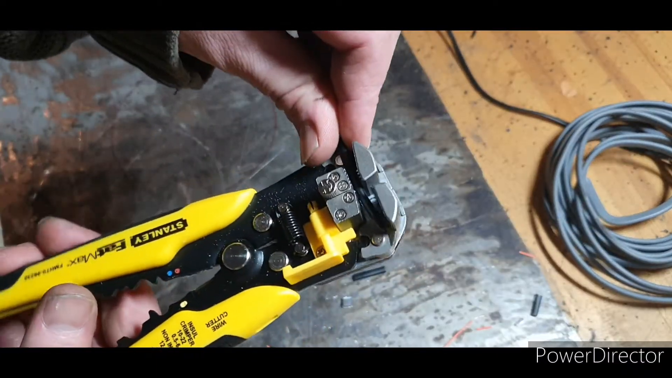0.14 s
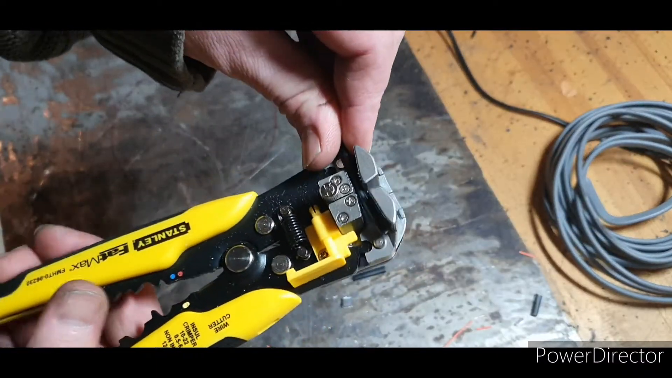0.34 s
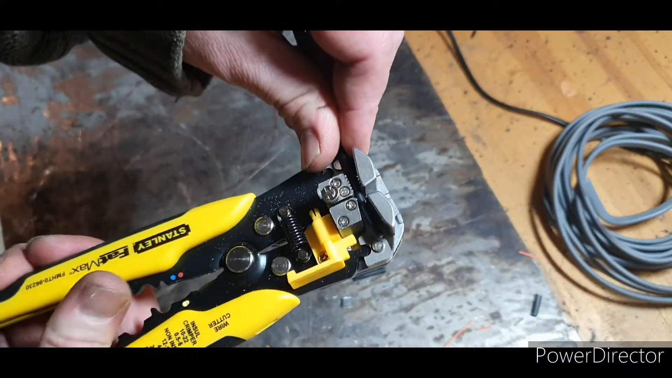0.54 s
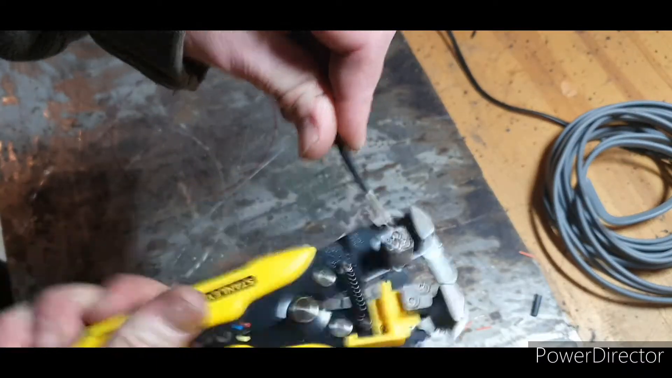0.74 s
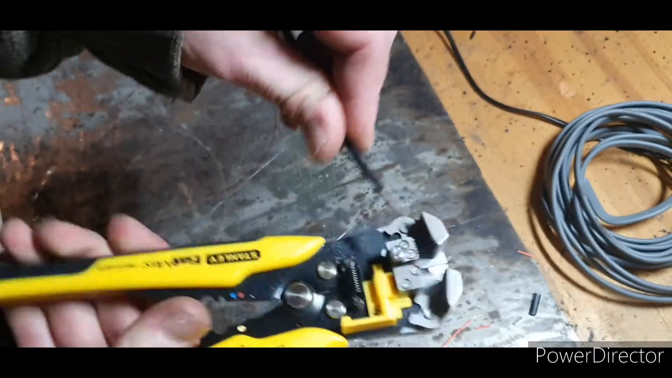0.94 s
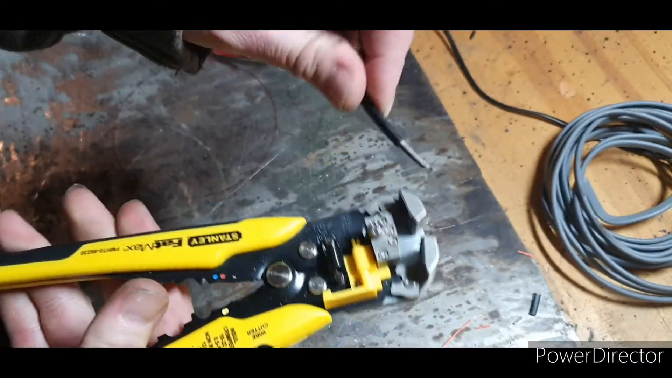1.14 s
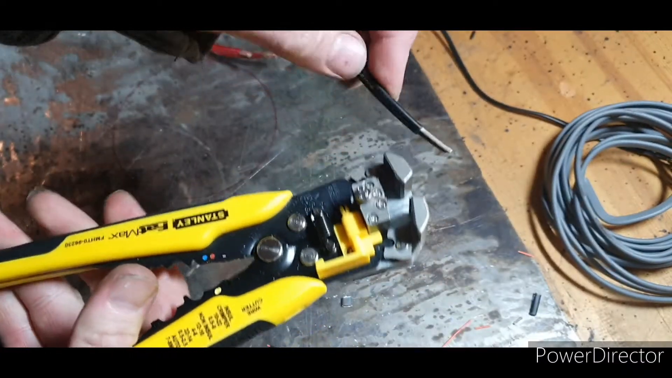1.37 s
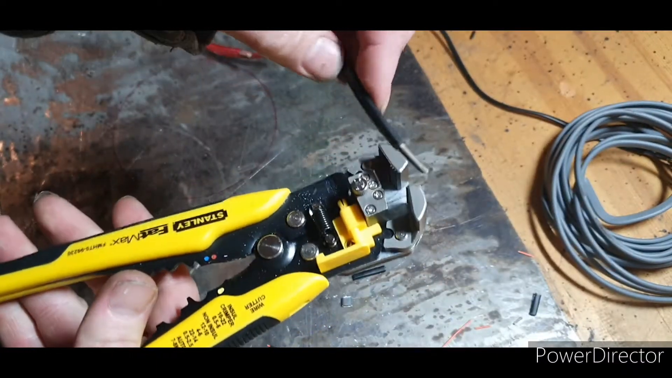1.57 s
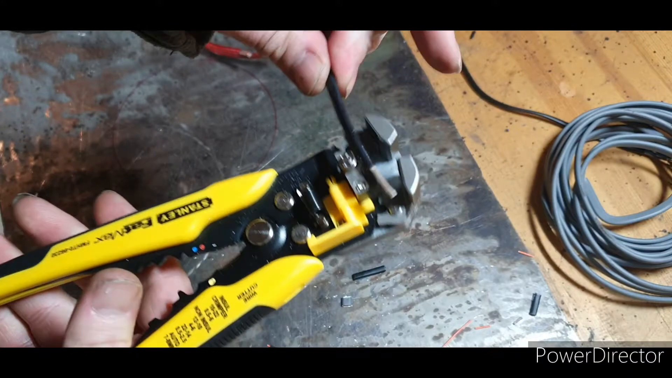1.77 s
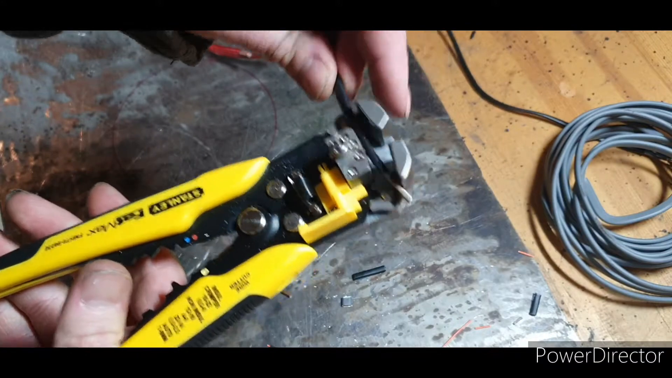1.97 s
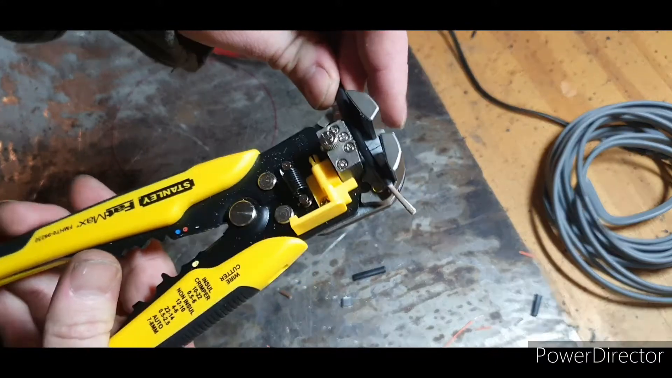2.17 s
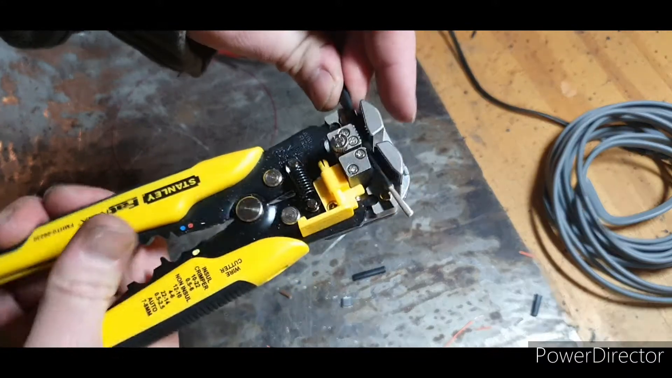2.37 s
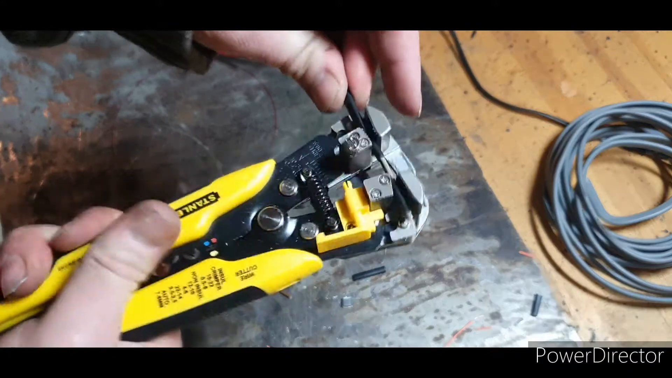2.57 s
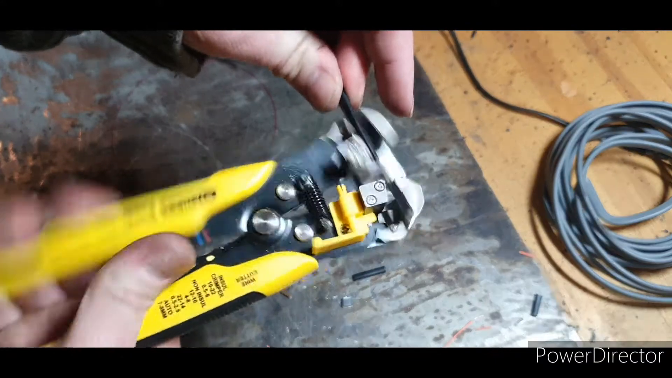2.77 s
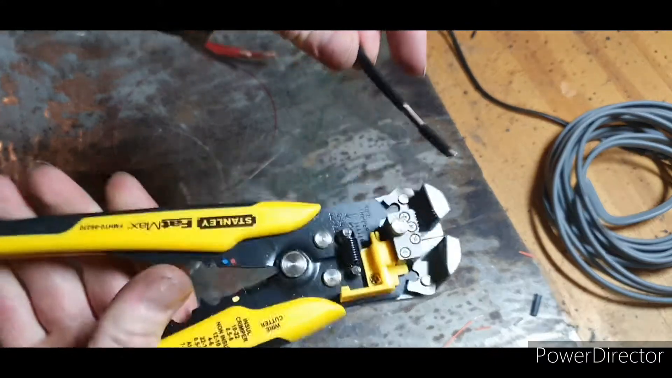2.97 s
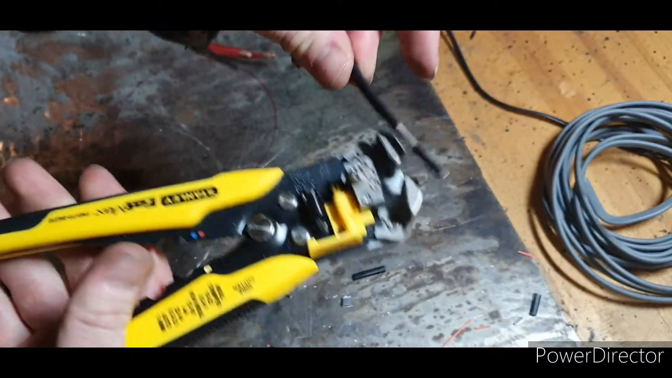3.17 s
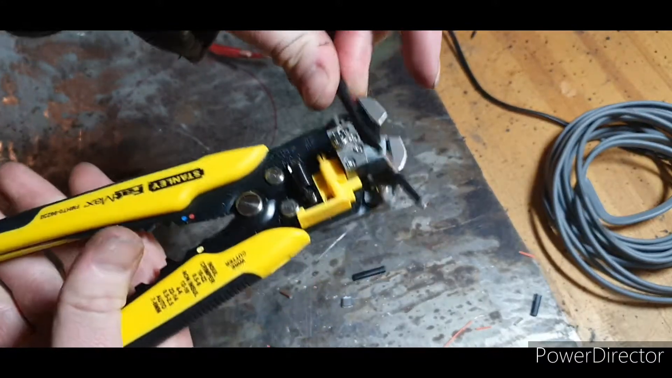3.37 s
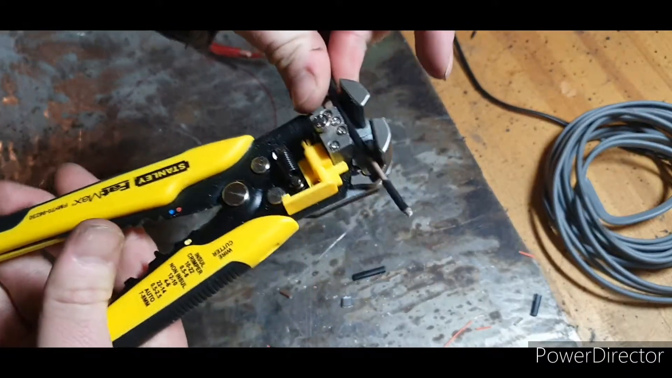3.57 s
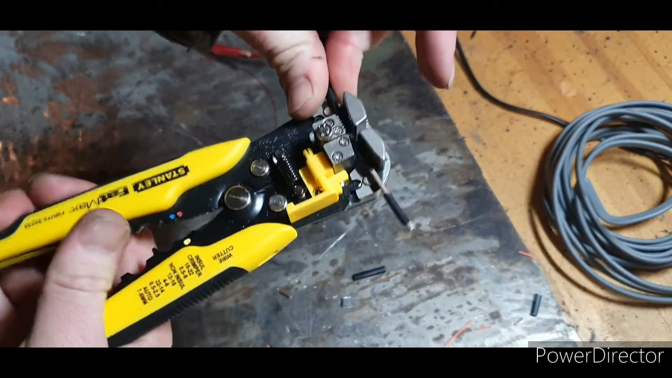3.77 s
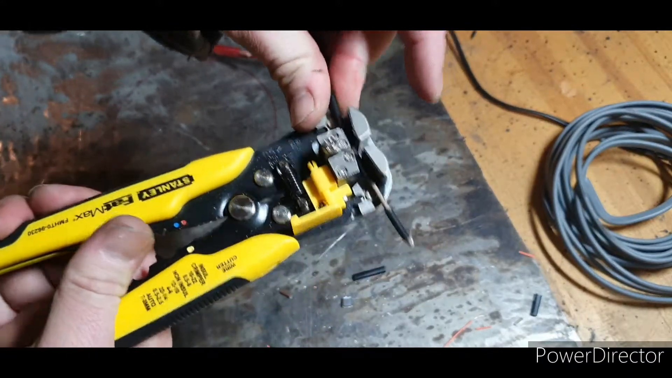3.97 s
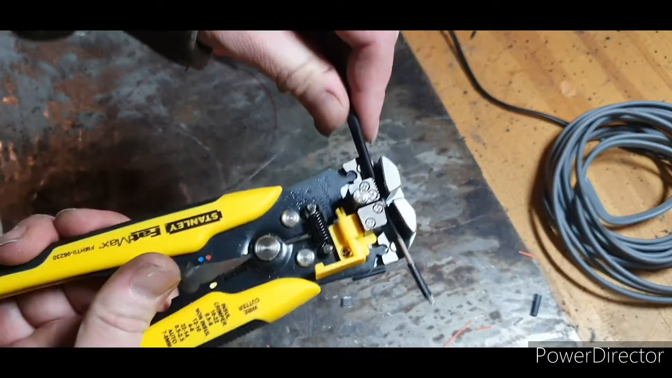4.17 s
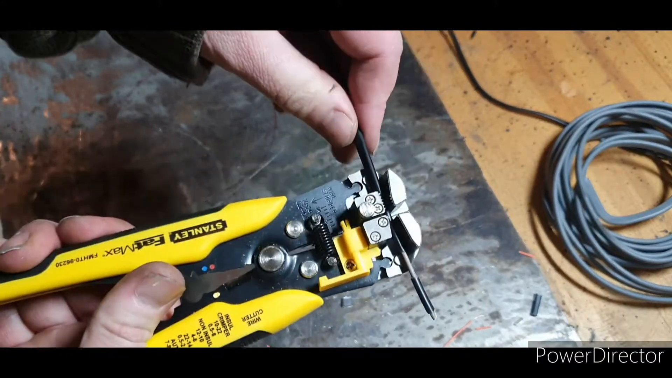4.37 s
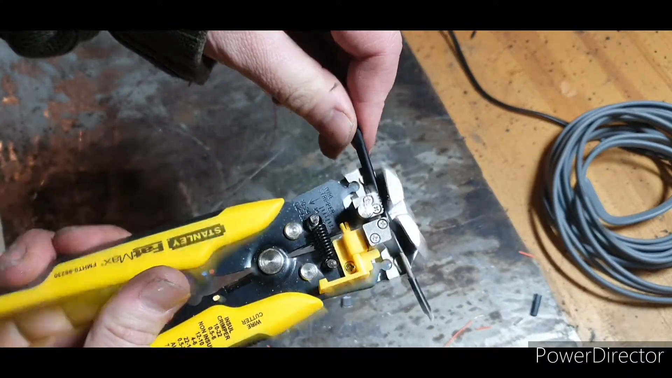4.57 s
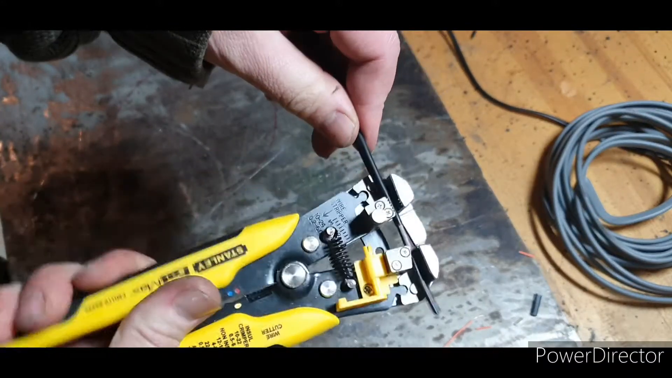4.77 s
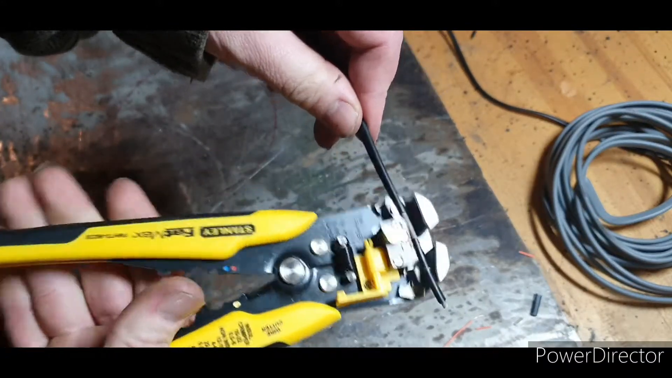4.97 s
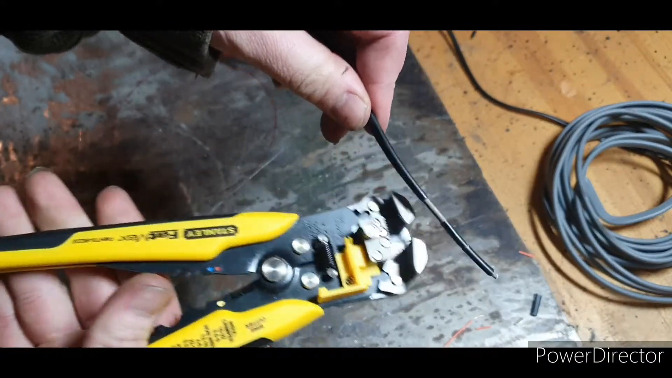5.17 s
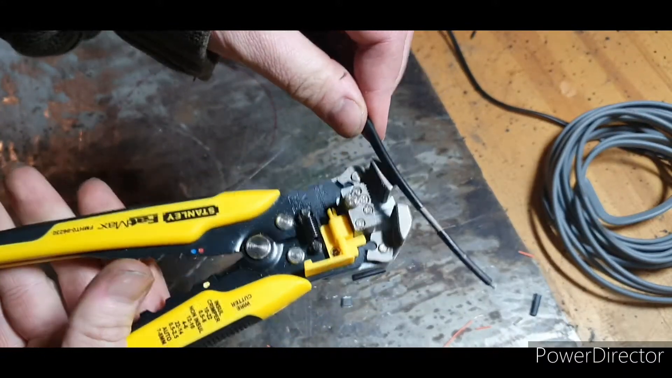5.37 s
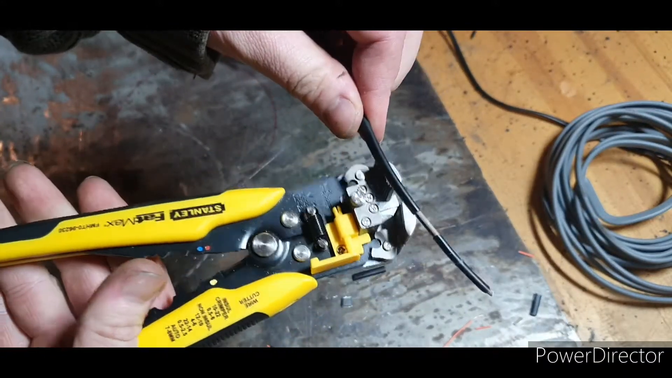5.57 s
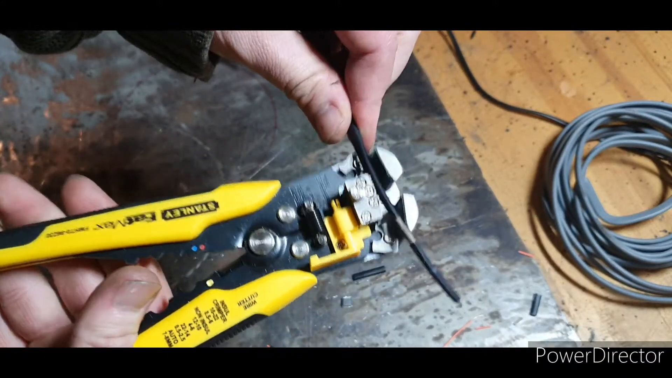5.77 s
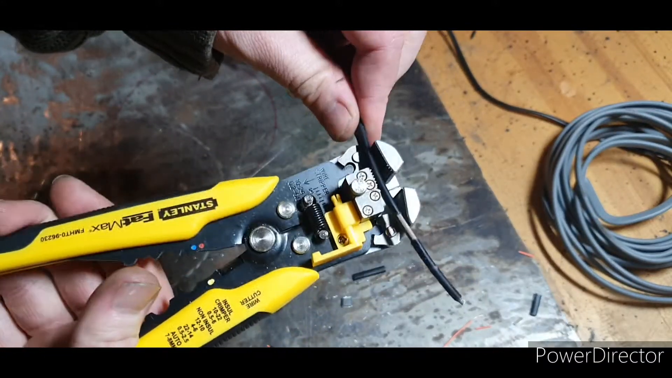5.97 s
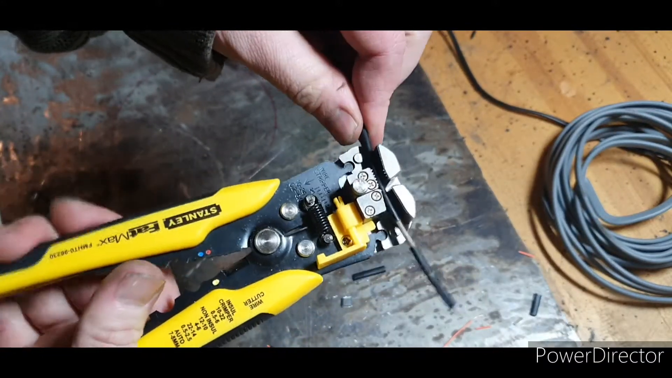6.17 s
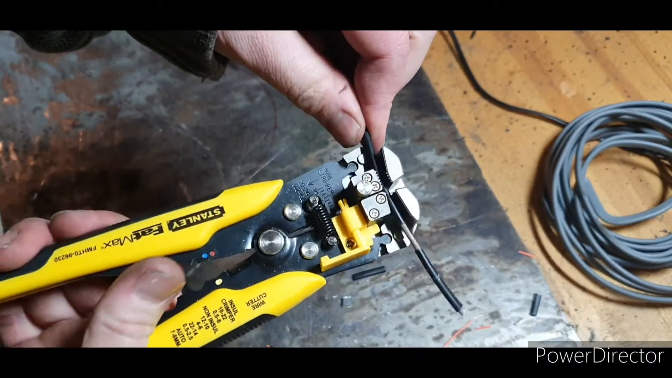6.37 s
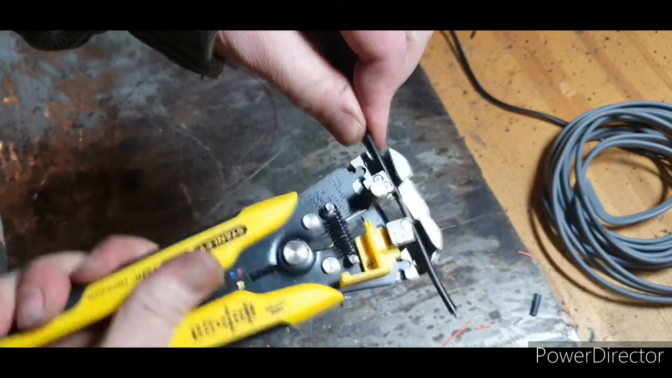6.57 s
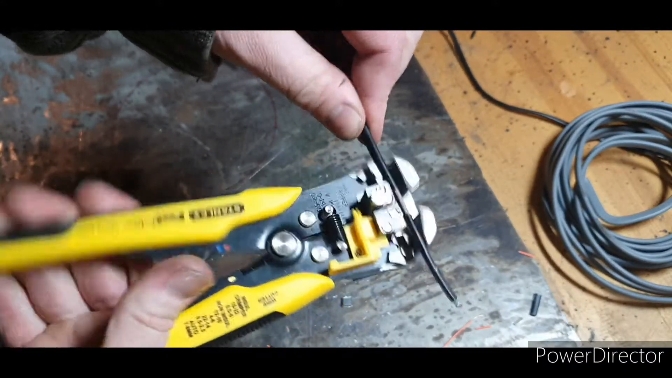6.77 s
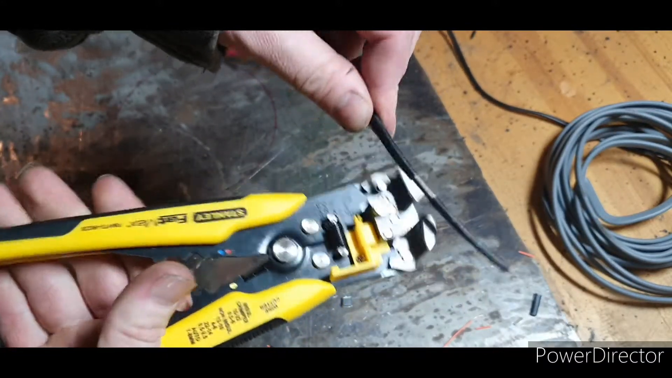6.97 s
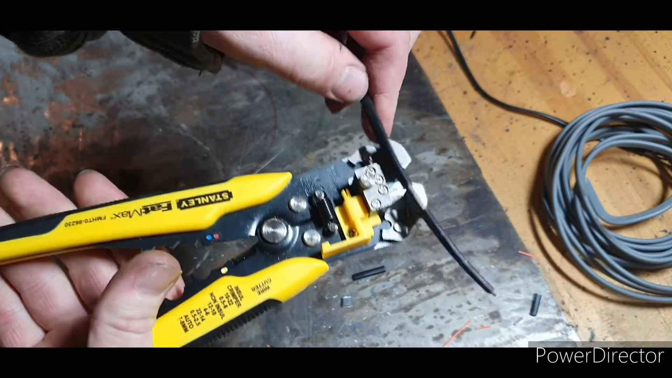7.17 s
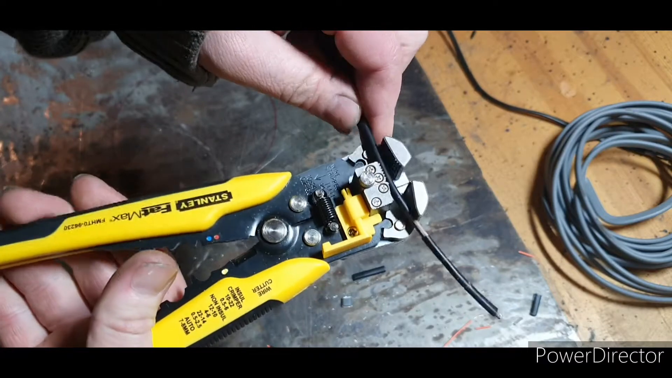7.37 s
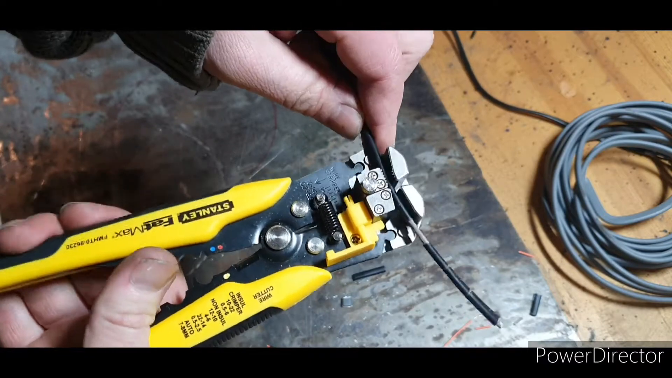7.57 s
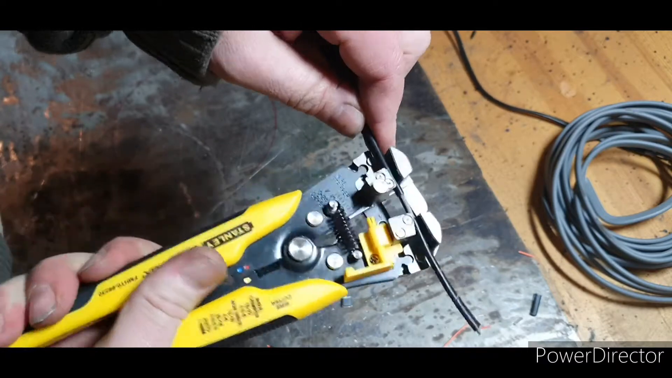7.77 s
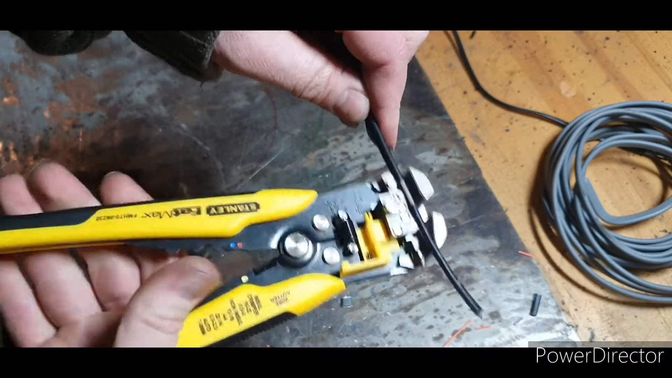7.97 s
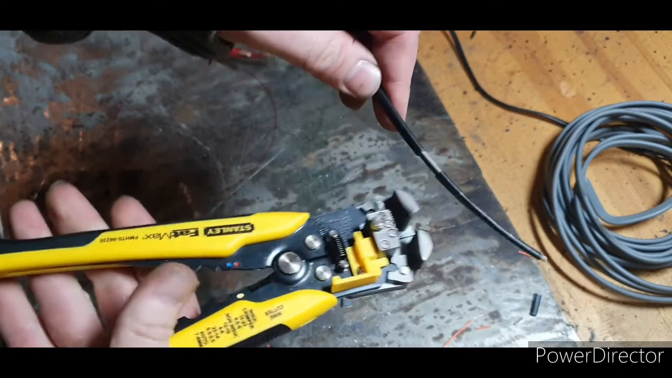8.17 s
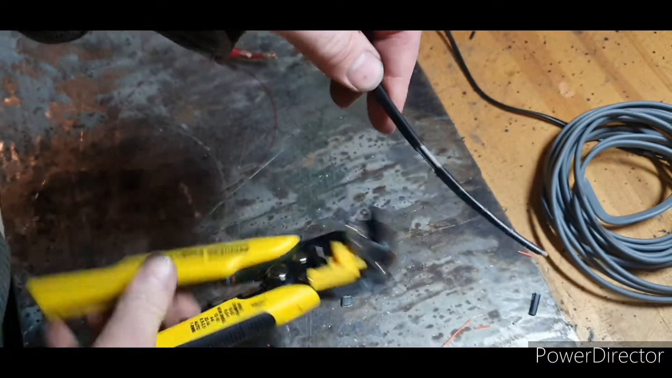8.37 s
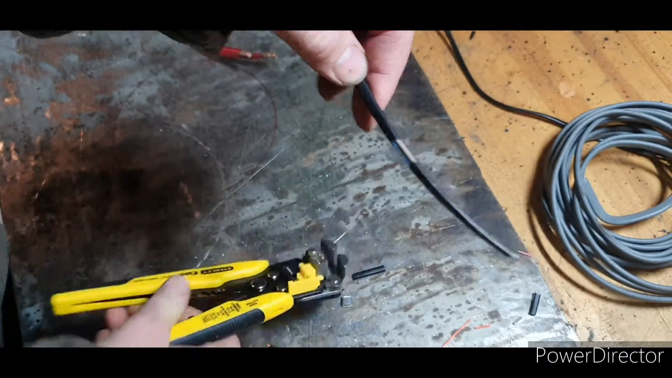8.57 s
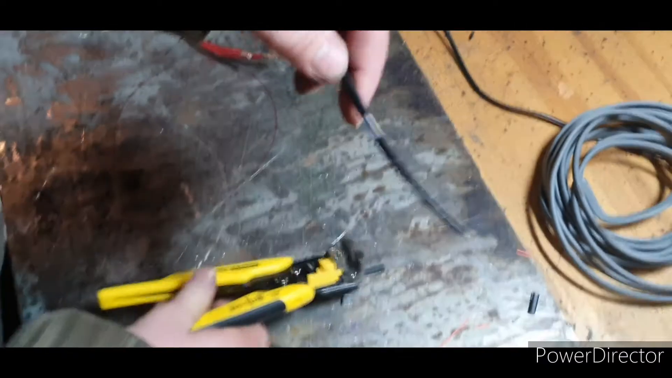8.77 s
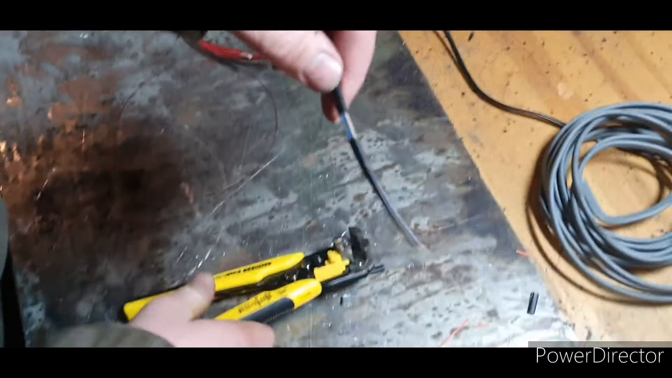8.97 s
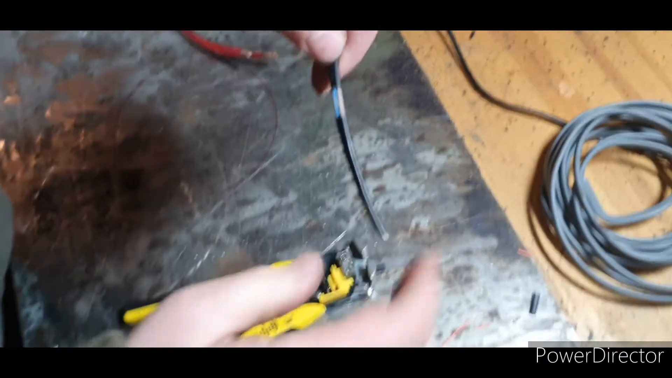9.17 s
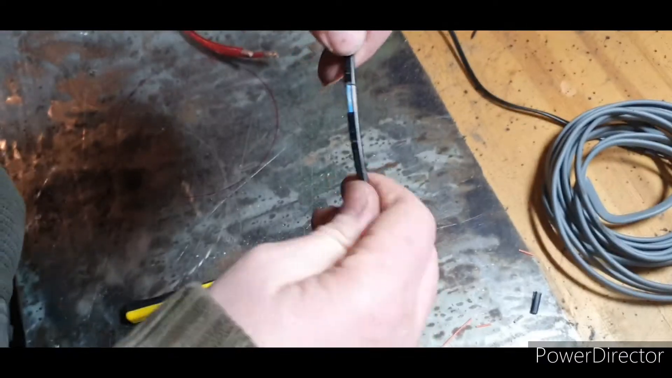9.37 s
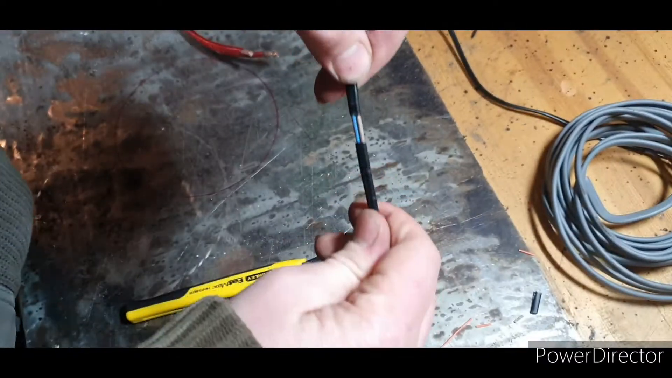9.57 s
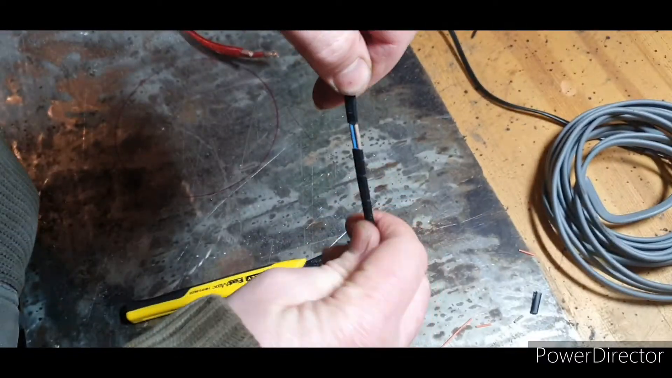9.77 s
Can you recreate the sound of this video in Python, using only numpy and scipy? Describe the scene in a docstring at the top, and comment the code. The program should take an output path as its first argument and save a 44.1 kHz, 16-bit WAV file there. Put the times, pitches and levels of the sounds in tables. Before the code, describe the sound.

Close over a workbench in a small workshop, automatic wire strippers are squeezed five times. Each squeeze gives a tiny crunch and sharp snap with a soft low thump, then two clicks and a bright springy metal slam as the jaws open. Light wire scrapes and ticks fill the gaps over faint low hum. Finally the tool drops, booming and clattering.

```python
"""A faint machine hum and a few light ticks, then the thump and snap of automatic wire strippers on a cable.
Recorded close over a workbench in a small workshop, with two microphones; five squeezes in all.
Each squeeze crunches and snaps through the insulation; the slides click back and the spring slams the jaws open.
At the end the tool is dropped and tumbles on the bench, which booms. Blows are filtered noise bursts and
decaying sine modes; scrapes are gritty noise; the hum is unsteady sines over filtered noise."""
import sys
import numpy as np
from scipy import signal
from scipy.fft import rfft, irfft, next_fast_len
from scipy.io import wavfile
from scipy.ndimage import map_coordinates

SR = 44100
rng = np.random.default_rng(int(sys.argv[2]) if len(sys.argv) > 2 else 0)


def generate_wav(sig):
    """Save sig (samples, or channels by samples) to the path in sys.argv[1] as 16-bit PCM at SR."""
    pcm = np.round(np.clip(np.atleast_2d(sig).T, -1, 1) * 32767).astype(np.int16)
    wavfile.write(sys.argv[1], SR, pcm)


N = 433503
TOP_HZ = 15700  # upper band limit
LEAD = round(.012 * SR)  # samples kept ahead of each blow
T = (np.arange(SR // 2) - LEAD) / SR  # seconds from one blow
CLICK_TILT_DB = 3  # brightness of the clicks, dB per octave

# squeezes through the insulation, levels before each layer's own gain:
# snap_s, snap_db, crunch_db, jolt_db, crunch_length_s (the crunch comes this long before the snap)
SQUEEZES = [(0.7482, -5.5, -18, -21, 0.0053), (2.55, -14, -27, -21.5, 0.0066),
            (4.6488, -15, -17.5, -18.5, 0.0062), (6.602, -17, -19.5, -18, .0068),
            (7.789, -26, -24.5, -21, 0.0086)]
# the slides click twice as the hand lets go, coming free and then home: time_s, relative_level_db
CLICKS = [(0.9348, -21.5), (0.9478, -19), (2.815, -24.5), (2.8403, -16.5), (4.8619, -24.5), (4.8745, -23),
          (6.775, -21), (6.7912, -23.5), (7.9463, -20), (7.9564, -19)]
# the spring slams the jaws open: time_s, relative_level_db, run_up_s
SLAMS = [(1.019, -10, 0.0045), (2.8648, -10, 0.004), (4.9750, -9, 0.0033), (6.8426, -9, 0.00365),
         (7.986, -9.5, 0.003)]
# spectrum of the steel jaws: frequency_hz, relative_density_db_per_hz
JAWS = [(100, -12.5), (700, -12), (1350, -13), (1900, -2), (2400, -4.5), (3300, 1.5), (4500, -2),
        (5600, -4), (7200, -7), (8700, -1.5), (10000, -3.5), (11500, -8.5), (14000, -15), (15300, -14.5)]
# spectrum of soft thumps of the hand: frequency_hz, relative_density_db_per_hz
FLESH = [(30, -21), (70, 7.5), (150, -6.5), (220, -1.5), (340, -0.5), (600, -14.5), (1100, -10.5),
         (2500, -40), (8000, -61)]
# spectrum of the rattling board: frequency_hz, relative_density_db_per_hz
BOARD = [(40, -11), (100, -0.5), (160, -0.5), (270, 2), (400, -3.5), (550, -6.5), (680, -10.5),
         (1050, -15.5), (1500, -26.5), (2500, -30), (10000, -50)]


def jaws():
    """Steel on insulation and steel on steel: bite, crunch and snap, then the slips and clicks of release."""
    # the slides slip in small jerks as the grip eases: time_s, level_db
    slips = [(0.838, -40), (0.871, -38), (0.8837, -31.5), (2.683, -51.5), (4.778, -42), (4.829, -46.5),
             (6.712, -51), (6.732, -43.5), (6.752, -41), (7.918, -43), (7.934, -38.5)]
    bite_lead, bite_db = 1.3, -39.5  # the blades first touch this many crunch lengths before the snap
    out = np.zeros((2, N))
    for s, snap_db, crunch_db, _, length in SQUEEZES:
        add(out, s - bite_lead * length, amp(bite_db) * click(tilt_db=1.2))
        crunch = contact(JAWS, -0.14, body_db=-3.5, body_t60=0.05, rub_db=-10.0, rub_s=0.0031)
        add(out, s - length, amp(crunch_db + 2.5) * crunch)
        snap = contact(JAWS, 1.0, body_db=-5.5, body_t60=0.039, rub_db=-23.5, rub_s=0.0011)
        add(out, s, amp(snap_db) * snap)
    for s, db in slips:
        add(out, s, amp(db) * scrape(tilt_db=-1.5, rise_s=0.0012))
    for s, db in CLICKS:
        add(out, s, amp(db) * click(CLICK_TILT_DB))
    return out


def spring():
    """The jaws chatter along their guide, hit the stop, ring the frame, rebound and rattle; the spring twangs."""
    # modes of the steel frame before the hand damps them: frequency_hz, relative_level_db, t60_s
    steel = [(1720, 5, .22), (1863, 8, .25), (2000, 8, 0.2), (2272, 3, .2), (3170, -1.5, 0.19),
             (3321, 5.5, 0.6), (3838, 0, .3), (4560, 2, .22), (5540, -1, .28), (8490, 5, 0.14)]
    # spectrum of the spring-driven blow: frequency_hz, relative_density_db_per_hz
    slam_spectrum = [(100, -21.5), (1400, -11.5), (1750, -9), (2100, 0.5), (2500, -6), (3200, 0.5),
                     (4500, -0.5), (6000, 3.5), (7200, -2.5), (8900, 2.5), (11000, -0.5), (13000, -2),
                     (15300, -14)]
    frame_db, grip_t60 = -35.5, 0.21  # ring relative to the slam; extra damping by the gripping hand (s)
    # the twang starts sharp by sag_hz and sags to its rest pitch
    rest_hz, sag_hz, sag_s, twang_db, twang_t60 = 1730, 662, .035, -26.5, .15
    rebound_s, rebound_db = .0075, -18.5  # one rebound from the stop, level relative to the slam
    out = np.zeros((2, N))
    for s, db, run_up in SLAMS:
        chatter = amp(-7.5) * (T < 0) * np.exp(np.minimum(T + run_up, 0) / 0.00015)
        stop = .8 * fade(.006) + amp(-6) * fade(.05)
        blow = colour(grain() * (chatter + stop), uneven(slam_spectrum, depth_db=1))

        roughness = amp(5.5 * wobble(260, len(T)))
        rattle = colour(grain() * fade(0.16) * roughness, slam_spectrum, tilt_db=-1.05)
        frame = amp(frame_db) * fade(grip_t60) * ring(steel, scatter_db=2.5, spread=.9)

        pitch_hz = rest_hz + sag_hz * np.exp(-np.abs(T) / sag_s)
        phase = 2 * np.pi * np.cumsum(pitch_hz) / SR + wobble(100, len(T))
        twang = amp(twang_db) * fade(twang_t60) * np.sin(phase)

        add(out, s, amp(db + 0.5) * (blow + frame + twang + amp(-29.5) * rattle))
        add(out, s + rebound_s, amp(db + rebound_db) * click(CLICK_TILT_DB))
    return out


def hands():
    """Heavily damped low thumps, soft bumps with the tool's moves, knocks of the linkage and hollow pocks."""
    # the linkage knocks as the load comes off it: time_s, level_db
    knocks = [(4.777, -41.5), (6.730, -37), (7.917, -35.5)]
    # soft low bumps of the hand: shifts of hold, a recoil and a shudder after a squeeze: time_s, level_db
    bumps = [(0.44, -56.5), (1.037, -40.5), (1.205, -47.5), (2.371, -50), (3.836, -59.5), (4.696, -33),
             (6.375, -56.5), (6.944, -49.5), (7.678, -51)]
    # hollow knocks, perhaps the hand bumping the recorder's stand:
    # time_s, level_db (before the left/right balance)
    pocks = [(0.8844, -12), (1.445, -42), (4.535, -44)]
    # spectrum of the hollow knocks: frequency_hz, relative_density_db_per_hz
    hollow_spectrum = [(200, -18.5), (600, -10.5), (900, 1), (1150, -0.5), (1550, -6), (2100, -21),
                       (10000, -23.5)]
    palm_db, recoil_db = -27, -36  # push on the palm relative to a click; recoil relative to a slam
    out = np.zeros((2, N))
    for s, _, _, jolt_db, length in SQUEEZES:
        # low modes: frequency_hz, level_db, t60_s
        push = ring([(66, 0, .095), (105, -11, .1)], scatter_db=.5, spread=.3)
        thump = amp(-11.0) * colour(noise(0.17) * fade(0.26), FLESH)
        add(out, s, amp(jolt_db) * (push + thump))
        crunch_thump = colour(noise(0.92) * fade(0.018), FLESH)
        add(out, s - length, amp(jolt_db - 7.0) * crunch_thump)
    for s, db in CLICKS:
        add(out, s, amp(db + palm_db) * bump())
    for s, db in knocks:
        knock = np.sin(2 * np.pi * 400 * T) + .5 * colour(noise(.5), BOARD)
        add(out, s, amp(db) * fade(.035) * knock)
    for s, db, _ in SLAMS:
        add(out, s, amp(db + recoil_db) * bump())
    for s, db in bumps:
        add(out, s, amp(db) * bump())
    for s, db in pocks:
        shape = fade(.04) * (1 - np.exp(-np.abs(T) / .001))
        hollow = amp([[-3], [2]]) * colour(noise(0.2) * shape, hollow_spectrum)  # leans right
        soft_bump = amp(-50) * bump()
        add(out, s, amp(db) * hollow + soft_bump)
    return out


def bench():
    """Each landing booms the top's modes, rattles the board and clacks the tool; returns (boom, clatter)."""
    # the tool lands and tumbles: time_s, boom_db, steel_db, contact_s, top_pitch_ratio (at that spot)
    drops = [(8.787, -10.5, -17, .0016, .97), (8.965, -12, -31.5, .0005, 1), (8.988, -16.5, -54, 0.0089, 1),
             (9.036, -14, -48, 0.0043, 1), (9.111, -15.5, -23.5, 0.0016, .92),
             (9.121, -10.5, -10.5, 0.00072, 1), (9.166, -16, -24, 0.00071, 0.99)]
    # modes of the bench top before that ratio: frequency_hz, relative_level_db, t60_s
    top_modes = [(38, -20, .8), (67, -13, 0.6), (90.5, 0.5, 0.3), (116, -3.5, 0.28), (206, -8, .2),
                 (250, -9.5, 0.14), (316, -5.5, 0.18), (397, -16, .15), (590, -16, .15), (775, -21, .13)]
    # spectrum of the whole tool clacking on the bench: frequency_hz, relative_density_db_per_hz
    clack_spectrum = [(500, -1), (850, 8), (1200, 5), (1800, 0.5), (2800, -6.5), (3700, -4.5), (5500, -9.5),
                      (7000, -20), (9500, -13.5), (15000, -31)]
    # how the bench leans between the microphones: frequency_hz, left_minus_right_db
    balance = [(90, -5), (130, -2), (280, 3.5), (480, -2)]
    board_hardness, board_db = 0.38, -2  # board level lies between boom (0) and steel (1), plus a gain
    # the nose clinks as it touches down before the hardest landing
    clink_s, clink_hz, clink_db, clink_t60 = 9.1095, 2800, -20.5, .025
    boom, clatter = np.zeros((2, 2, N))
    for s, boom_db, steel_db, contact_s, tuning in drops:
        # a long, soft contact excites only the low modes
        modes = []
        for hz, db, t60 in top_modes:
            softness_db = 10 * np.log10(1 + (hz * contact_s) ** 4)
            modes.append((hz * tuning, db - softness_db, t60))
        onset = 1 - np.exp(-np.abs(T) / .003)
        add(boom, s, amp(boom_db) * ring(modes, scatter_db=1.5, spread=.45) * onset)

        board = colour(noise(0.4) * fade(0.13), BOARD)
        clack = contact(clack_spectrum, 0, body_db=-2.5, body_t60=0.044, rub_db=-5, rub_s=0.0014)
        clatter_db = boom_db + board_hardness * (steel_db - boom_db) + board_db
        add(clatter, s, amp(clatter_db) * board + amp(steel_db) * clack)
    add(clatter, clink_s, amp(clink_db) * fade(clink_t60) * np.sin(2 * np.pi * clink_hz * T))

    # the tool skids from its first landing to its last
    first_s, last_s = drops[0][0], drops[-1][0]
    skid = swell(first_s, last_s - first_s, attack_s=.002, release_s=0.03) * amp(1.5 * wobble(90, N))
    clatter += amp(-52) * colour(noise(0.51, size=N) * skid, BOARD, tilt_db=6.0)
    return pan(boom, balance), pan(clatter, balance)


def wire():
    """The wire is fed in and drawn out: it scrapes the jaws, and the loose parts tick."""
    # the wire scrapes along the jaws: time_s, level_db, brightness_db_per_octave
    scrapes = [(1.194, -42.5, -2), (1.332, -48.5, -7), (1.411, -47, -5), (1.465, -44, -7),
               (2.268, -47.5, -2), (2.279, -52, -4), (2.315, -49.5, -3.5), (3.745, -55, -5),
               (3.757, -51, -3), (3.777, -50.5, -4), (5.837, -61.5, -5), (6.17, -54, -5.5),
               (6.192, -46, -1), (6.213, -46.5, -1.5), (7.322, -58.5, -3), (7.503, -53, -4.5),
               (7.544, -51, -1.5), (7.583, -55, -4.5), (7.715, -65, -2.5)]
    # light ticks of the loose jaws and linkage, and at 2.539 s a hard tick as the blades bite ahead of the
    # second crunch: time_s, level_db, brightness_db_per_octave
    ticks = [(0.324, -54, 0.5), (0.3643, -37.5, 1), (0.678, -59.5, -2), (2.022, -58, 0), (2.421, -61.5, -2),
             (2.511, -59.5, -4), (2.539, -30, -7.5), (3.51, -64.5, -6), (3.73, -51.5, -4), (4.534, -39, 2),
             (4.603, -60, 4), (5.084, -45, -3), (6.484, -61, -4), (6.562, -60, 4), (7.077, -59.5, -3),
             (7.761, -51, 0)]
    out = np.zeros((2, N))
    for s, db, tilt in scrapes:
        add(out, s, amp(db) * scrape(tilt, rise_s=0.004))
    for s, db, tilt in ticks:
        tick = contact(JAWS, tilt, body_db=-4.5, body_t60=0.14, rub_db=-15.5, rub_s=.001)
        add(out, s, amp(db) * tick)
    return out


def workshop():
    """Low rumble, thin hiss, a machine's tones with wandering phase, and a low drone that swells twice."""
    # the machine's steady tones: frequency_hz, level_db_rms
    whine = [(60, -60.5), (700, -85), (801, -83)]
    # the drone's swells: full_from_s, hold_s, level_db_rms
    drones = [(3.976, 0.65, -54.5), (4.99, 0.18, -43)]
    # spectrum of the shop's rumble and hiss: frequency_hz, relative_density_db_per_hz
    air = [(20, -8), (40, -1), (58, -2), (85, -11.5), (115, -7), (150, -16.5), (280, -24.5), (500, -38),
           (850, -31), (1300, -44.5), (3000, -48.5), (7400, -58.5), (8700, -45), (10500, -57.5)]
    t = np.arange(N) / SR

    def tone(hz):
        """A sine of unit rms with a wandering phase."""
        return np.sqrt(2) * np.sin(2 * np.pi * hz * t + 1.3 * wobble(8.4, N))

    drone = sum(amp(db) * swell(s, hold, attack_s=0.091, release_s=0.034) for s, hold, db in drones)
    hum = sum(amp(db) * tone(hz) for hz, db in whine) + drone * tone(61)
    return hum + amp(-57) * colour(noise(0.4, size=N), air)


def room(x):
    """Each third of a second gets its own short diffuse tail of noise, decaying at its own rate in each band."""
    # decay of the small workshop: frequency_hz, t60_s
    decay = [(60, 0.84), (300, 0.27), (1000, 0.3), (3000, 0.28), (8000, 0.21), (15000, 0.22)]
    out = np.zeros((2, N + SR))
    step = SR // 3
    for start in range(0, N, step):
        hz, t, z = signal.stft(rng.standard_normal((2, SR // 2)), SR, nperseg=256)
        falling = amp(-60 * t / along(decay, hz)[:, None])
        build_up = 1 - np.exp(-t / 0.00076)
        tail = signal.istft(z * falling * build_up, SR, nperseg=256)[1]
        wet = signal.fftconvolve(x[:, start:start + step], tail / np.linalg.norm(tail[0]), axes=1)
        out[:, start:start + wet.shape[1]] += wet
    return out[:, :N]


def contact(spectrum, tilt_db, body_db, body_t60, rub_db, rub_s, crack_t60=0.00099):
    """A part slides, strikes with a short crack, and its dense modes die away."""
    rub = (T < 0) * amp(rub_db) * np.exp(-np.abs(T) / rub_s)
    shape = rub + fade(crack_t60) + amp(body_db) * fade(body_t60)
    return colour(grain() * shape, uneven(spectrum, depth_db=1.6), tilt_db)


def click(tilt_db):
    """One hard, short click of steel on a part of the tool."""
    hit = contact(JAWS, tilt_db, body_db=-14, body_t60=.06, rub_db=-14, rub_s=.002, crack_t60=.007)
    return amp(5) * hit


def scrape(tilt_db, rise_s):
    """Two surfaces rub in a short, gritty swell."""
    shape = (T < 0) * np.exp(-np.abs(T) / rise_s) + fade(0.012) + amp(-7.5) * fade(0.13)
    grit = amp(4 * wobble(420, len(T)))
    return colour(grain() * grit * shape, uneven(JAWS, depth_db=2), tilt_db)


def bump():
    """A soft low bump of the hand: a damped noise burst."""
    return colour(noise(0.6) * fade(0.18), FLESH)


def ring(modes, scatter_db, spread):
    """Modes struck at new strengths; each reaches the two microphones with its own phase gap."""
    out = np.zeros((2, len(T)))
    sides = np.array([[1], [-1]])
    for hz, db, t60 in modes:
        strength, gap = rng.standard_normal(2)
        wave = np.sin(2 * np.pi * hz * T + sides * spread * gap)
        out += amp(db + scatter_db * strength) * fade(t60) * wave
    return out


def grain():
    """Stereo noise of one blow, broken up by tiny contacts."""
    return noise(.55) * amp(2 * wobble(1400, len(T)))


def uneven(spectrum, depth_db):
    """Each point of contact favours its own resonances."""
    hz = np.geomspace(100, 16000, num=60)
    return np.column_stack([hz, along(spectrum, hz) + depth_db * rng.standard_normal(len(hz))])


def noise(alike, size=len(T)):
    """White noise at two microphones that share a part of it."""
    share = np.clip(alike, 0, 1)
    common = np.sqrt(share) * rng.standard_normal(size)
    return common + np.sqrt(1 - share) * rng.standard_normal((2, size))


def colour(x, spectrum, tilt_db=0):
    """Causal minimum-phase filter, power-normalised over the band; tilts in dB per octave from 1.5 to 11 kHz."""
    m = 2 * next_fast_len(x.shape[-1] // 2 + 2048)
    hz = np.fft.rfftfreq(m, 1 / SR)
    gain = amp(along(spectrum, hz) + tilt_db * np.log2(np.clip(hz, 1500, 11000)))
    power = np.mean(gain ** 2 * (hz < TOP_HZ))
    # folding the cepstrum forward makes the filter minimum-phase
    cepstrum = irfft(np.log(gain / np.sqrt(power)))
    cepstrum[1:m // 2] *= 2
    cepstrum[m // 2 + 1:] = 0
    return irfft(rfft(x, m) * np.exp(rfft(cepstrum)))[:, :x.shape[-1]]


def wobble(rate, size):
    """A smooth random curve with rate knots a second."""
    knots = rng.standard_normal(int(size * rate / SR) + 4)
    return map_coordinates(knots, [np.arange(size) * rate / SR])


def fade(t60):
    """Exponential decay from the moment of the blow."""
    return (T >= 0) * amp(-60 * np.abs(T) / t60)


def swell(start_s, hold_s, attack_s, release_s):
    """An envelope that rises up to start_s, holds and dies away."""
    t = np.arange(N) / SR - start_s
    return np.exp(np.minimum(t, 0) / attack_s - np.maximum(t - hold_s, 0) / release_s)


def amp(db):
    """Decibels to gain."""
    return 10 ** (np.asarray(db) / 20)


def along(points, hz):
    """(Hz, value) points read on a log axis."""
    f, v = np.transpose(points)
    return np.interp(np.log(hz + 1), np.log(f), v)


def add(track, s, sound):
    """Mix in a sound whose blow falls at s."""
    start = round(s * SR) - LEAD
    track[:, start:start + sound.shape[-1]] += sound[..., :N - start]


def offset(pair):
    """Sound reaches the right microphone 10 samples later than the left."""
    return np.array([pair[0], np.roll(pair[1], 10)])


def pan(pair, balance):
    """Each frequency leans to its own side."""
    lean_db = along(balance, np.fft.rfftfreq(N, 1 / SR)) / 2
    return irfft(rfft(pair) * amp([lean_db, -lean_db]), N)


def scene():
    """Steel and clatter radiate into the shop; the low thumps stay close and nearly dry."""
    tool = offset(jaws() + spring() + wire())
    boom, clatter = bench()
    thuds = offset(hands()) + boom
    room_send = amp(-12.0) * tool + amp(-6.0) * clatter + amp(-18.5) * thuds
    return tool + clatter + thuds + room(room_send) + workshop()


def record(dry):
    """The microphones lose the deepest bass, peaks clip at full scale, and a steep cut sets the band limit."""
    bass_cut = signal.butter(3, 34, "high", fs=SR, output="sos")
    wave = np.clip(signal.sosfilt(bass_cut, dry), -1, 1)
    m = next_fast_len(N + SR // 2)
    hz = np.fft.rfftfreq(m, 1 / SR)
    band_limit = 1 / np.sqrt(1 + (hz / TOP_HZ) ** 120)
    return irfft(rfft(wave, m) * band_limit, m)[:, :N]


dry = scene()
out = record(dry)
generate_wav(out)
```